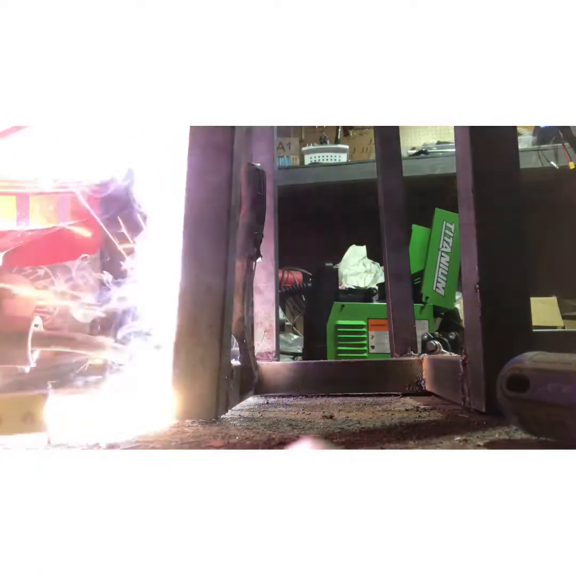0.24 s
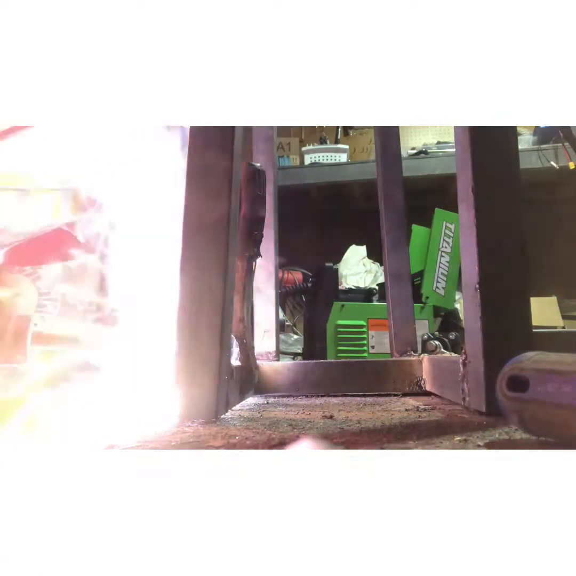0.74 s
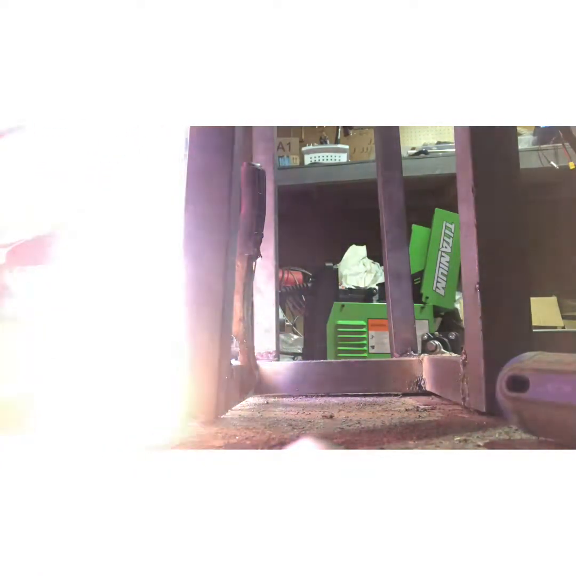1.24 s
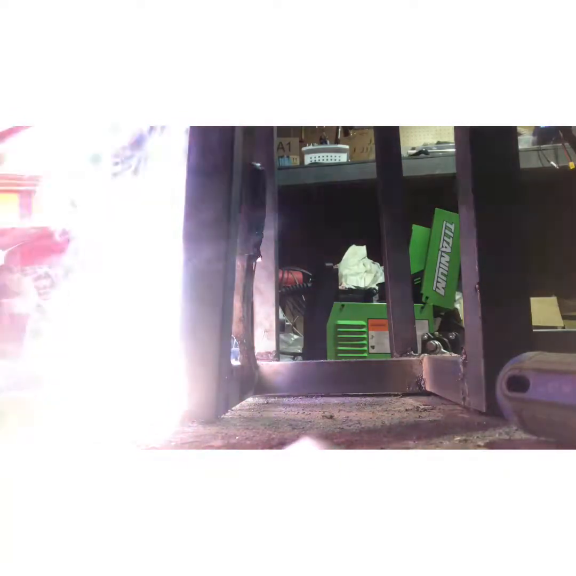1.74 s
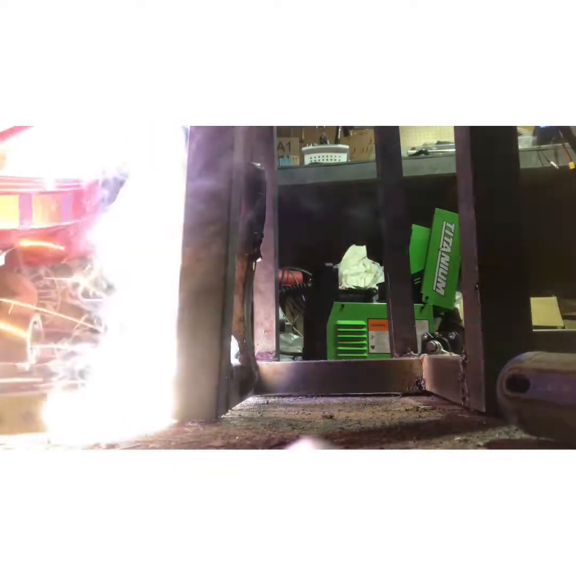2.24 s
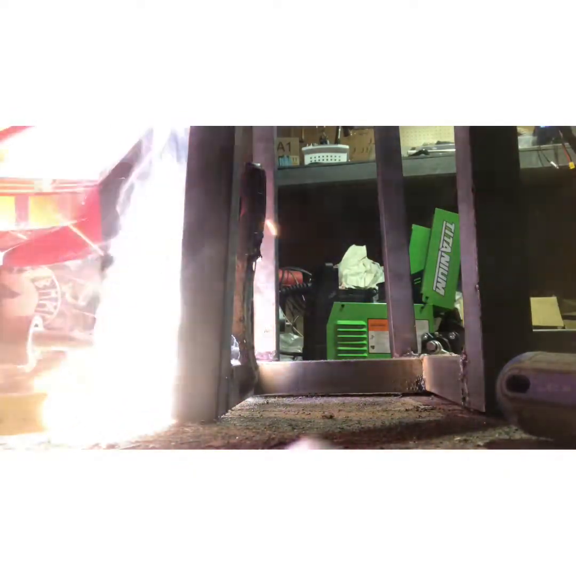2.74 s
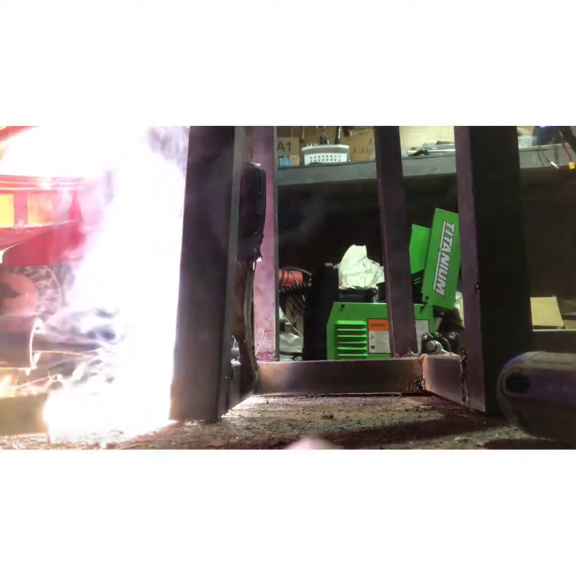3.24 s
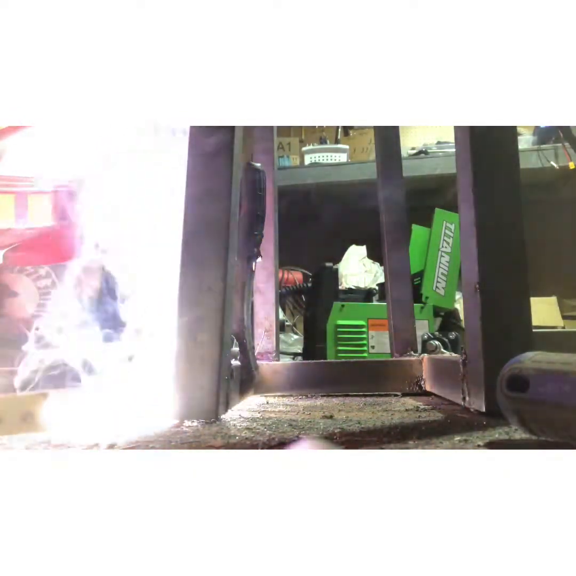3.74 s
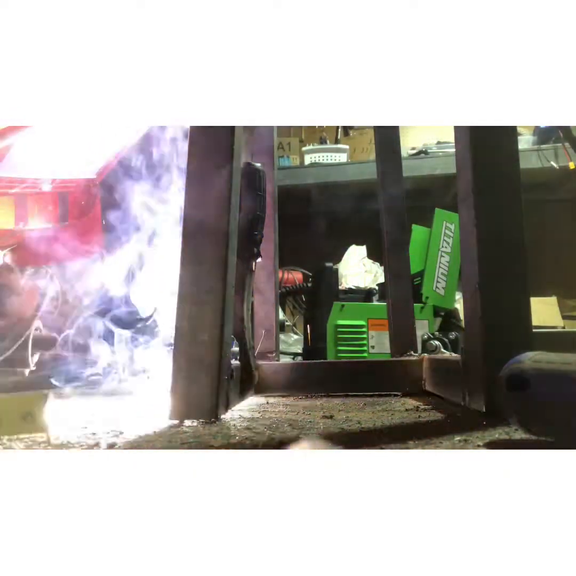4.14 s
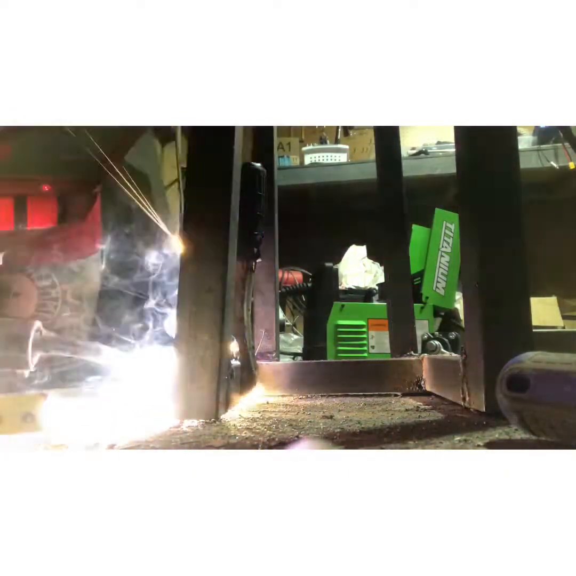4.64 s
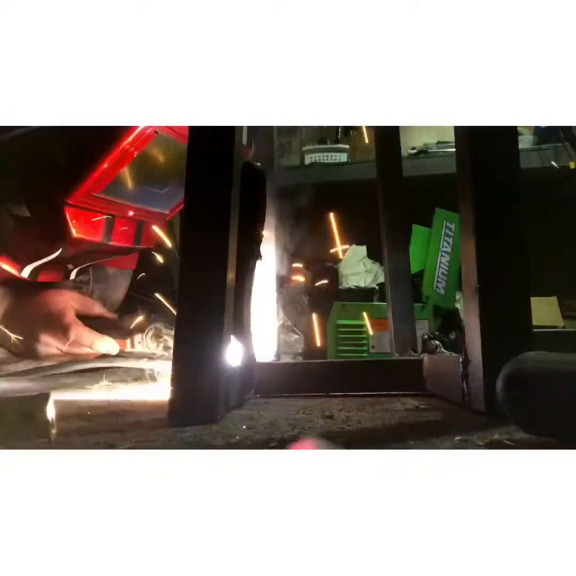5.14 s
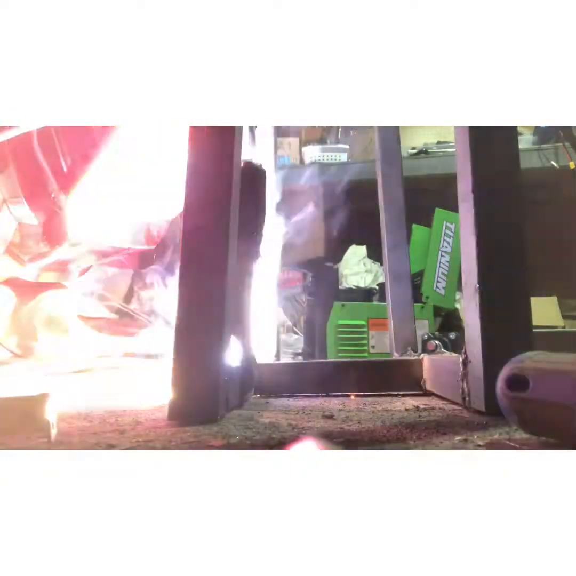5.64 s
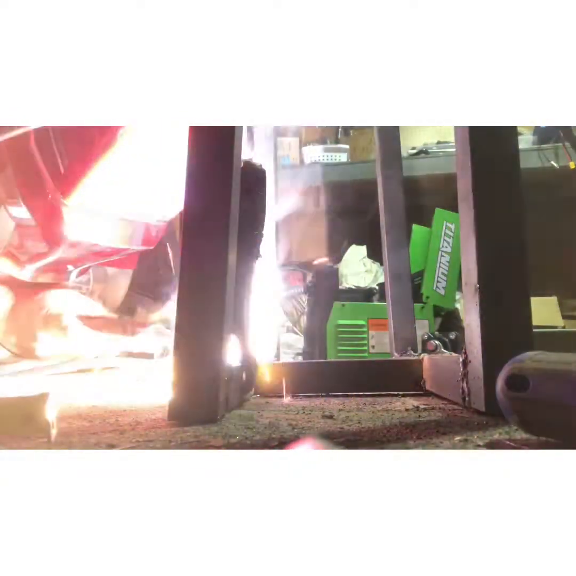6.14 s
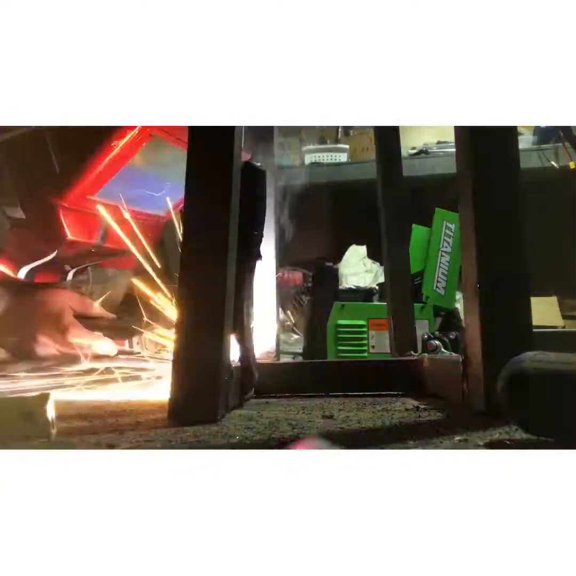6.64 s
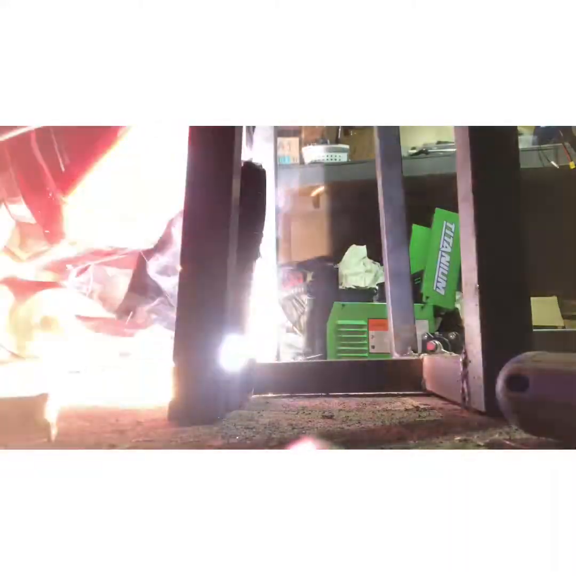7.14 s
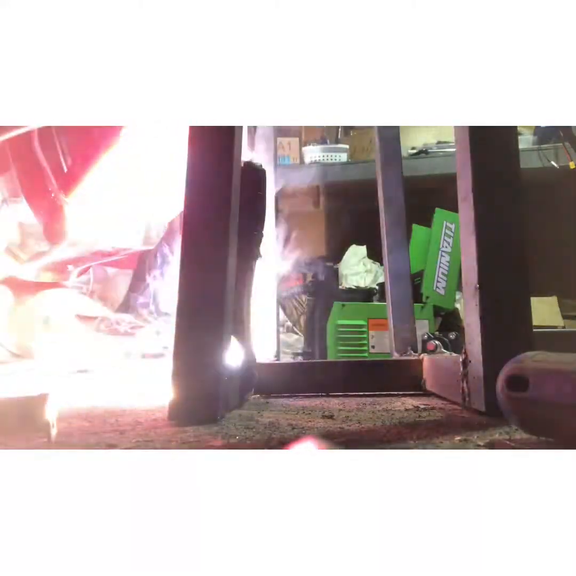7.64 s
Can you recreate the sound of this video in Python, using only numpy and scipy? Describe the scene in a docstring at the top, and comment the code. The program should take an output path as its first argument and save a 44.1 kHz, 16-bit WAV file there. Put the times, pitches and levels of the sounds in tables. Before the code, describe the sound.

From 0 s a stick-welding arc is already burning close to the microphone on a workshop bench: dense, bright, gritty frying made of hiss and countless tiny clicks, with a slight mains-rate buzz. Molten drops short it irregularly for about 4 to 40 milliseconds, each ending in a snapping re-strike. Shorts crowd together until 2.4 s, are somewhat sparser to 3 s, then bring strong bursts around 3.5 to 4.3 s. Sharp spatter pops stand out throughout, with dull thumps near 0.9, 1.2, 3.2 and 4.2 s. At about 4.57 s everything drops to silence for under a tenth of a second. From 4.66 s a second weld sizzles several decibels quieter, hissier and shifting in level, weakest near 5.4 s. Longer gaps and re-strikes cluster from 5.9 to 6.9 s, with a prominent pop and thump at 6.54 s. Steadier sizzling continues to the end, around 7.9 s, over faint fan and room air.

```python
"""In a workshop, a stick-welding arc sizzles on a steel frame, heard from the bench.
The arc is noise and random clicks; molten drops short it out for a moment and it strikes again with a burst.
Spatter pops are clicks with noisy tails, thumps are band-limited pulses, fan and workshop air are shaped noise.
Frame and bench filter the sound differently at two seams; a cut of silence lies between them."""
import sys
import numpy as np
from scipy import signal
from scipy.fft import rfft, irfft
from scipy.io import wavfile
from scipy.ndimage import uniform_filter1d

SR = 44100
rng = np.random.default_rng(int(sys.argv[2]) if len(sys.argv) > 2 else 0)


def generate_wav(signal):
    """Clip the signal to [-1, 1] and save it as 16-bit WAV at the path in sys.argv[1]."""
    frames = np.transpose(np.atleast_2d(signal))
    scaled = np.clip(frames, -1, 1) * 32767
    pcm = np.round(scaled).astype(np.int16)
    wavfile.write(sys.argv[1], SR, pcm)


N = 347508
CUT_START_S, CUT_END_S = 4.573, 4.661  # the second seam begins where the cut ends


def undb(db):
    """Decibels to an amplitude factor."""
    return 10 ** (np.asarray(db) / 20)


def level(x, db):
    """Scale a signal to an RMS level in dB."""
    return x * undb(db) / np.sqrt(np.mean(x ** 2))


def unit_energy(h):
    """Scale an impulse response so that white noise keeps its RMS level."""
    return h / np.sqrt(np.sum(h ** 2))


def through(x, h):
    """Pass a sound along a path with impulse response h."""
    return signal.fftconvolve(x, h)[:N]


def walk(rate_hz):
    """Random levels held 1 / rate_hz seconds and slewed twice; spread near 1."""
    hold = int(SR / rate_hz)
    held = np.repeat(rng.standard_normal(N // hold + 1), hold)
    slewed = uniform_filter1d(uniform_filter1d(held, hold), hold)
    return 1.44 * slewed[:N]


def sputter(clicks, tail_s, tail_db):
    """Each click is a sharp pressure step followed by a short puff of noise of its own."""
    keep = np.exp(-1 / (tail_s * SR))
    puffs = signal.lfilter([0, 1], [1, -keep], clicks) * rng.standard_normal(N)
    return clicks + undb(tail_db) * puffs


def flares(rate_hz=110, fade_s=0.0015, share=1.76):
    """The boiling pool flares suddenly and dies back within milliseconds."""
    chance, size = rng.random((2, N))
    kicks = (chance < rate_hz / SR) * size
    return 1 + share * signal.lfilter([1], [1, -np.exp(-1 / (fade_s * SR))], kicks)


def sizzle(t, spits_per_s=1500, spread_db=4.2, hiss_db=(-3.5, 3), ripple_hz=120, ripple=.17):
    """Plasma hiss and small spits; both pulse with the rectified mains, flare and flutter."""
    chance, size = rng.random((2, N))
    size_db = np.minimum(-spread_db * np.log(size + 1e-9), 15)  # mostly small, a few large
    clicks = (chance < spits_per_s / SR) * undb(size_db)
    spits = sputter(clicks, tail_s=.00015, tail_db=-11)
    # the frame hides the second seam, softening its spits: more hiss beside them
    hiss = undb(np.where(t < CUT_END_S, *hiss_db)) * rng.standard_normal(N)
    source = level(spits - spits.mean(), 0) + hiss
    mains = 1 + ripple * np.sin(2 * np.pi * ripple_hz * t)
    flutter = undb(0.48 * walk(60))
    return level(source * mains * flares() * flutter, 0)


# The body of the burning arc, stepping down at the change of seam.
# Each row: time in seconds, RMS level in dB before shorts and bursts, lift above 8 kHz in dB.
ARC_COURSE = [(0, -31.5, -3), (.7, -32, 0.5), (1.25, -32, -0.5), (1.65, -30.5, -3), (2.4, -31, -1.5),
              (3.05, -32.5, 3), (3.6, -30.5, 0.5), (4.55, -33, -1), (4.66, -41, 5), (4.77, -37.5, 1),
              (4.95, -42.5, 2), (5.2, -40.5, 0), (5.44, -45, 3), (5.55, -37, 1), (5.9, -35.5, 0),
              (6.1, -39.5, 3), (6.5, -38.5, 2.5), (6.95, -37, 3.5), (7.1, -38, -6), (7.15, -42.5, 1),
              (7.42, -38, 2), (7.75, -36.5, 1), (7.88, -36, 3)]


def arc_course(t):
    """Strength and treble gain of the arc, gliding in dB from row to row."""
    at, arc_db, lift_db = np.transpose(ARC_COURSE)
    return undb(np.interp(t, at, arc_db)), undb(np.interp(t, at, lift_db))


def droplets(count=14, silence_ms=(4, 7), burst_db=(2, 7)):
    """Small drops that short the first seam at random, as rows like ARC_SHORTS."""
    when, length, size = rng.random((count, 3)).T
    lengths_ms = np.interp(length, (0, 1), silence_ms)
    bursts_db = np.interp(size, (0, 1), burst_db)
    return list(zip(when * CUT_START_S, lengths_ms, bursts_db))


# Molten drops that short the arc until it strikes again; the row at 4.599 is the arc fading into the cut.
# Each row: re-strike in seconds, silence before it in ms, burst over the arc in dB (negative is weak).
ARC_SHORTS = [(0.027, 21, 3), (0.094, 9.1, 3), (0.153, 19, 14), (0.235, 9.5, 12), (0.263, 10.4, 7.5),
              (0.311, 22, 8), (0.413, 24, 7), (0.477, 11, 4), (0.502, 6.7, -2), (0.56, 37, 10.5),
              (0.653, 6.9, 0), (0.727, 30.4, 7), (0.782, 7.7, -3), (0.806, 3.8, 6), (0.858, 38, 6.5),
              (0.954, 4.3, 11), (0.984, 21, 4), (1.041, 9.2, 1), (1.102, 15, 7), (1.205, 33, 10.5),
              (1.314, 30, 5), (1.507, 24, 12), (1.572, 9.8, 7), (1.667, 19.7, 5.5), (1.721, 5, 0.5),
              (1.744, 7.6, 6), (1.815, 16, -1), (1.865, 7.2, 7.5), (1.886, 4.4, 6), (1.911, 6.4, 5),
              (1.946, 8.2, 3), (1.991, 23, 8), (2.047, 9.6, 5), (2.08, 7.7, 4.5), (2.119, 4.6, 7.5),
              (2.161, 24, 9), (2.22, 8.9, 1), (2.244, 9, 3), (2.272, 7.7, 7), (2.311, 7.2, 13),
              (2.336, 4.6, 7), (2.37, 12.7, 11), (2.704, 19.5, 15), (2.756, 8.3, 9), (2.928, 6.1, 6),
              (2.96, 5.5, 7), (3.105, 8.4, 3), (3.199, 10.6, 11), (3.255, 9.8, 10), (3.317, 12.6, 9),
              (3.461, 34, 13.5), (3.521, 9.8, 6.5), (3.544, 9.8, 5), (3.634, 30.4, 8.5), (3.697, 11, 2),
              (3.723, 8.4, 13.5), (3.823, 22, 10.5), (3.871, 6.1, 12), (3.912, 19, 13), (3.973, 10, 10),
              (4.047, 26, 16.5), (4.106, 10, 11), (4.237, 23, 14), (4.302, 8.9, 0), (4.395, 14.6, 1),
              (4.599, 59, 1), (4.786, 20.6, 9.5), (4.847, 10.4, 12.5), (4.922, 50.5, 13.5),
              (5.108, 40, 2.5), (5.417, 4, 14), (5.558, 8.2, 7), (5.706, 9.6, -2), (5.761, 12.7, 4.5),
              (5.864, 33, 9), (6.033, 41.6, 5), (6.16, 30, 8.5), (6.323, 35, 15.5), (6.425, 21, 10.5),
              (6.568, 9.5, -4), (6.597, 15, -17), (6.651, 50, 7.5), (6.674, 11, 7), (6.744, 44.4, 7),
              (6.769, 8.4, 9), (6.825, 17, -14), (6.848, 13, 3), (6.898, 35, 6), (7.346, 5, 6),
              (7.364, 4.3, 7.5), (7.438, 31, 11), (7.527, 6.2, -1), (7.562, 7.6, 8), (7.602, 4, 1),
              (7.702, 4.5, 2), (7.759, 7.1, 2), (7.863, 4.9, -2)]


def burning(t, burst_s=0.0058, fade_s=0.002, ember_db=-26):
    """Gain of the arc: it dies into each short, then flares and settles."""
    gain = np.ones(N)
    for at, silence_ms, burst_db in list(ARC_SHORTS) + droplets():
        times = (at - silence_ms / 1000, at, at + 6 * burst_s)
        out, strike, settled = (int(np.clip(s * SR, 0, N)) for s in times)
        dying = np.exp(-(t[out:strike] - t[out]) / fade_s)
        gain[out:strike] *= undb(ember_db) + dying
        settling = np.exp(-(t[strike:settled] - at) / burst_s)
        gain[strike:settled] *= undb(burst_db * settling)
    return gain


# The loudest spatter pops.
# Each row: time in seconds, peak of the click in dB along its path, before the treble lift.
LOUD_POPS = [(0.1181, -11), (0.2353, -9), (0.7293, -8), (0.7824, -5), (0.8108, -10), (0.9851, -11),
             (1.215, -10), (1.5096, -9), (1.5358, -10), (1.5756, -6), (1.591, -10), (1.6727, -9),
             (1.8196, -11), (1.8666, -11), (1.9506, -11), (2.2215, -9), (2.2451, -8), (2.3399, -10),
             (2.3712, -8), (2.4246, -9), (2.7092, -10), (2.7577, -7), (2.8299, -10), (2.9618, -9),
             (3.2388, -11), (3.2557, -10), (3.5059, -11), (3.6997, -11), (3.8269, -10), (3.8753, -9),
             (4.3044, -7), (4.4085, -10), (4.7215, -15), (5.6685, -13), (5.9568, -16), (6.2552, -17),
             (6.3267, -17), (6.5434, -10), (6.6524, -15), (6.7472, -14), (6.859, -12)]


def spatter(t, path_one, path_two, arc_gain, small_count=50, small_db=(19, 11)):
    """Spatter pops with crackling tails; small ones fall at random and follow the arc."""
    when, size = rng.random((small_count, 2)).T
    small = (when * N).astype(int)
    small_peak_db = np.where(t[small] < CUT_END_S, *small_db) - size  # over the arc, up to 1 dB lower
    at, peak_db = np.transpose(LOUD_POPS)
    clicks = np.zeros(N)
    clicks[small] = undb(small_peak_db) * arc_gain[small]
    clicks[(at * SR).astype(int)] = undb(peak_db)
    # size each click for the peak it reaches along its path
    clicks = clicks / np.where(t < CUT_END_S, path_one.max(), path_two.max())
    return sputter(clicks, tail_s=.0012, tail_db=-19)


# Dull low thumps, some under pops or re-strikes.
# Each row: time in seconds, peak in dB before the room echoes.
DULL_THUMPS = [(0.859, -25), (1.2087, -28), (1.316, -32), (3.205, -25), (4.237, -27.5), (5.665, -27),
               (6.544, -17.5), (6.6517, -24.5), (6.748, -25), (6.8592, -36), (6.899, -37)]


def thumps(low_hz=140, high_hz=1500):
    """Bursting gas pockets push the air in one dull beat."""
    at, peak_db = np.transpose(DULL_THUMPS)
    push = np.zeros(N)
    push[(at * SR).astype(int)] = undb(peak_db)
    band = signal.butter(2, [low_hz, high_hz], "band", fs=SR, output="sos")
    beat_peak = signal.sosfilt(band, signal.unit_impulse(SR // 10)).max()
    return signal.sosfilt(band, push) / beat_peak


FFT = 4096
CONTRAST = 1.12  # scales the dB of every dip and hump


def response(points, dips=()):
    """Causal response of unit energy from a broad spectrum with dips and humps."""
    f = np.arange(FFT // 2 + 1) * SR / FFT + 1
    hz, db = np.transpose(points)
    gain_db = np.interp(np.log(f), np.log(hz), db)
    for centre, width, depth_db in dips:
        gain_db = gain_db + CONTRAST * depth_db / (1 + (2 * (f - centre) / width) ** 2)
    # fold the cepstrum forward in time: minimum phase, so nothing sounds early
    fold = irfft(np.log(undb(gain_db)))[:FFT // 2]
    fold[1:] *= 2
    return unit_energy(irfft(np.exp(rfft(fold, FFT))))


# Broad colour at each seam. Each row: frequency in Hz, relative level in dB.
COLOUR_ONE = [(100, -22), (700, -30), (1200, -6), (2500, 4), (4000, -10), (6500, 4.5), (8500, -15),
              (11000, 1), (15700, -19.5)]
COLOUR_TWO = [(100, -29), (700, -14), (1200, -4), (2500, 5), (4000, -12.5), (6500, 2.5), (8500, -5),
              (11000, -10.5), (15700, -24)]
# Dips and humps where echoes off bench and steel bars cancel or add.
# Each row: centre in Hz, width in Hz, depth or height in dB before CONTRAST.
ECHOES_ONE = [(750, 210, 9.0), (1630, 360, -10.9), (2150, 210, -17.1), (2830, 700, -6.9), (3670, 100, -6.9),
              (3920, 480, 9.0), (4240, 110, -8.9), (4530, 300, 9.0), (4680, 250, -13.4), (5550, 560, -13.7),
              (6320, 380, -11.2), (6630, 200, -10.8), (7230, 170, -5.0), (8220, 700, -5.0),
              (9470, 560, 7.1), (9820, 110, -6.1), (10230, 700, -13.6), (10980, 630, -13.1),
              (12090, 700, -8.4), (13110, 380, -7.8), (13560, 120, -6.3)]
ECHOES_TWO = [(960, 260, -6.7), (1550, 140, -2.9), (1820, 150, -17.3), (2420, 280, -15.1),
              (2980, 260, -11.2), (3500, 180, 5.1), (4480, 150, -5.1), (4960, 250, -12.5), (5240, 540, 8.7),
              (5520, 310, -11.1), (6300, 430, -9.5), (6910, 300, -15.9), (7550, 620, -8.9),
              (8020, 270, -10.0), (8860, 700, -9.2), (9840, 360, -5.5), (10440, 620, -13.2),
              (11380, 240, -6.3), (12030, 630, -5.7), (12760, 560, -6.9), (13550, 140, -5.8)]


def seam_paths():
    """Direct paths from the two seams; echoes off bench and steel bars carve their spectra."""
    return response(COLOUR_ONE, ECHOES_ONE), response(COLOUR_TWO, ECHOES_TWO)


def room(t60_s=.24, gap_ms=4, dull=.45):
    """Diffuse echoes from the workshop walls, duller than the direct sound."""
    t = np.arange(SR // 2) / SR
    echoes = rng.standard_normal(len(t)) * undb(-60 * t / t60_s) * (t > gap_ms / 1000)
    return unit_energy(signal.lfilter([1], [1, -dull], echoes))


# Spectrum of welder fan and workshop air. Each row: frequency in Hz, relative density in dB per Hz.
SHOP_SPECTRUM = [(30, -48), (48, -7), (72, 0.5), (105, -4), (150, -3.5), (200, -3), (600, -4.5),
                 (1100, -11), (2500, -14.5), (10000, -18.5), (15700, -26)]
# Hum of the fan. Each row: centre in Hz, width in Hz, height in dB before CONTRAST.
FAN_HUMP = [(438, 40, 3.5)]


def shop(shop_db=-52):
    """Fan and air noise that wavers a little."""
    air = through(rng.standard_normal(N), response(SHOP_SPECTRUM, FAN_HUMP))
    return level(air * undb(1.6 * walk(15)), shop_db)


def scene():
    """Arc and spatter along the path of their seam, then thumps, wall echoes and the shop."""
    t = np.arange(N) / SR
    path_one, path_two = seam_paths()
    lit = burning(t)
    strength, treble_gain = arc_course(t)
    arc = sizzle(t) * lit * strength
    pops = spatter(t, path_one, path_two, np.minimum(lit, 1) * strength)  # bursts do not swell the pops
    source = arc + pops
    treble = signal.sosfilt(signal.butter(2, 8000, "high", fs=SR, output="sos"), source)
    source = source + (treble_gain - 1) * treble
    first = t < CUT_END_S
    near = through(source * first, path_one) + through(source * ~first, path_two) + thumps()
    echoes = undb(-22.5) * through(near, room())
    return (near + echoes + shop())[None]


def record(dry, bass_hz=40, top_hz=15750):
    """The sound drops 22 dB and fades fast to silence between the seams; deepest bass and top are cut."""
    t = np.arange(N) / SR
    fading = undb(-22 - 1500 * np.clip(t - CUT_START_S, 0, 1))  # 1500 dB per second
    wet = dry * np.where((t > CUT_START_S) & (t < CUT_END_S), fading, 1)
    wet = signal.sosfilt(signal.butter(2, bass_hz, "high", fs=SR, output="sos"), wet)
    return signal.sosfilt(signal.ellip(12, .3, 70, top_hz, fs=SR, output="sos"), wet)


dry = scene()
out = record(dry)
generate_wav(out)
```